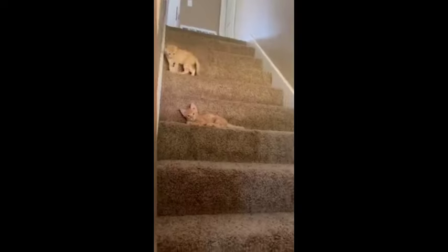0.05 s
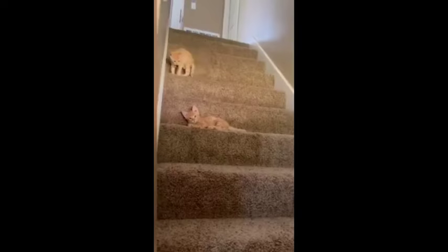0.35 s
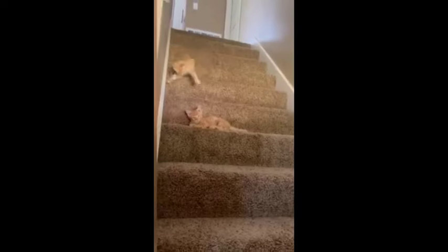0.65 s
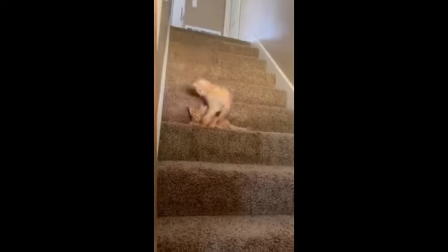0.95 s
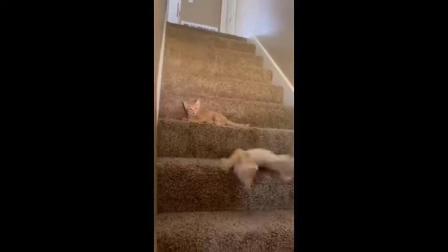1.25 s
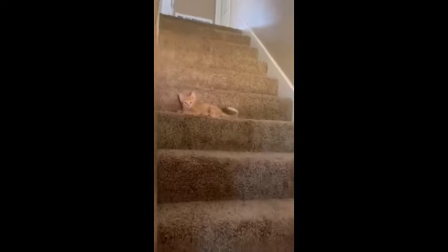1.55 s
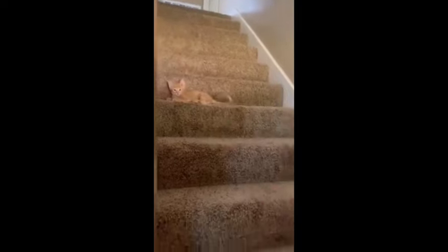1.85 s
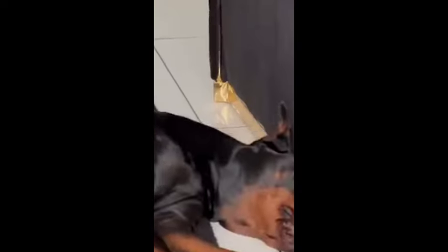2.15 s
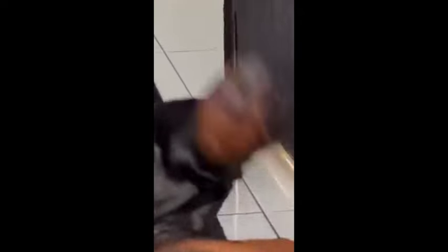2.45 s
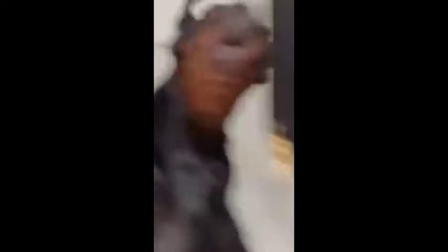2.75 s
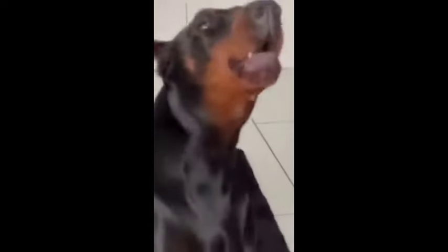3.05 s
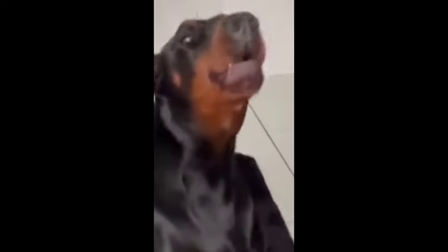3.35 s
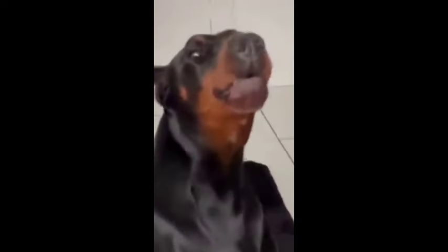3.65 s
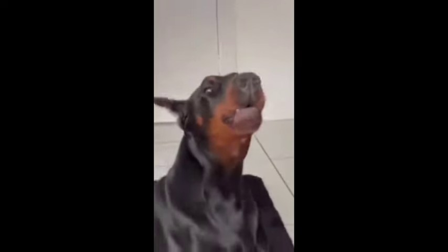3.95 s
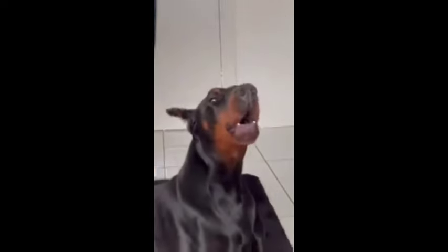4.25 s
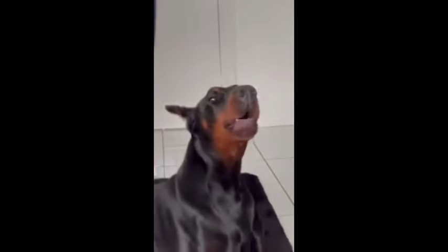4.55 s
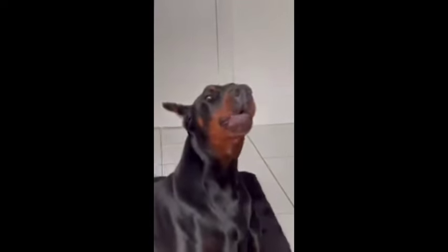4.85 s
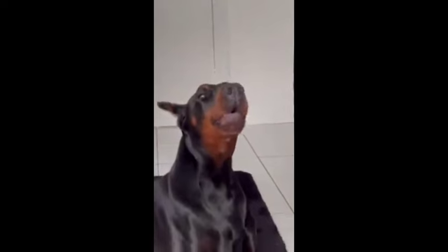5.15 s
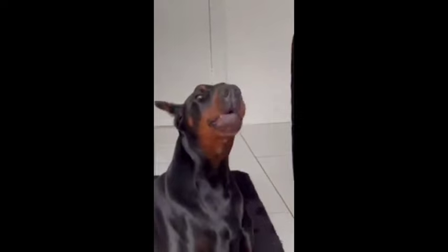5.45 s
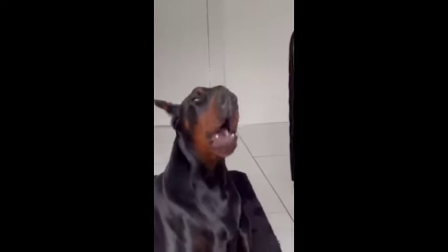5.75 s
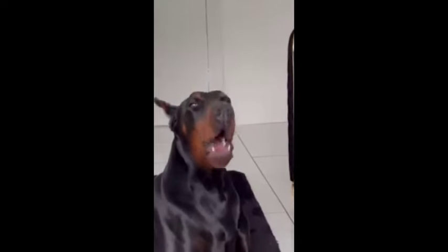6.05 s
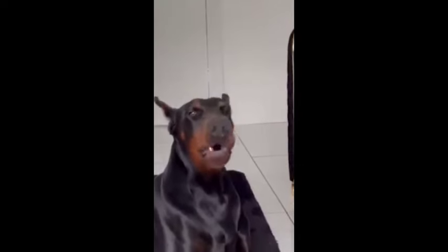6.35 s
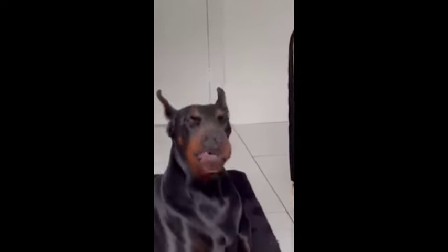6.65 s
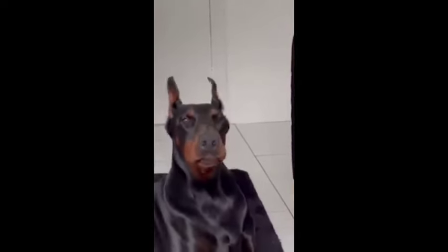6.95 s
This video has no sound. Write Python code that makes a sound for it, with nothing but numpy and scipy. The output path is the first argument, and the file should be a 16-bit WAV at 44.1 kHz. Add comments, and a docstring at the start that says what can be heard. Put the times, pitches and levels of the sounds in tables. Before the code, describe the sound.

Hollow thumps tumble down carpeted wooden stairs, then a large dog gives one long, wavering, cracking howl in a tiled room.

```python
"""A large dog gives one long howl in a tiled room. Its vocal folds chop the breath into pulses, which
throat, nose and muzzle colour. The jaw pumps about three times a second; the voice cracks between a low
and a high register, turns hoarse, then settles on a clean note that sags and dies.
Before the howl, a kitten tumbles down carpeted wooden stairs: hollow treads boom, boards knock and
paws scuff the pile. An abrupt cut joins the two scenes."""
import sys
import numpy as np
from scipy import signal
from scipy.fft import rfft, irfft, next_fast_len
from scipy.io import wavfile
from scipy.ndimage import uniform_filter1d, minimum_filter1d, map_coordinates

SR = 44100
rng = np.random.default_rng(int(sys.argv[2]) if len(sys.argv) > 2 else 0)


def digitize_waveform(pressure):
    """Quantize a signal to 16-bit integers and store it at the path in sys.argv[1].

    Rows of a 2-D input are taken as channels; values are limited to [-1, 1].
    """
    field = np.atleast_2d(pressure).T
    bounded = np.clip(field, -1, 1)
    quanta = np.round(bounded * 32767).astype(np.int16)
    wavfile.write(sys.argv[1], SR, quanta)


N = 316839
TIME = np.arange(N) / SR
CUT_S, HOWL_START_S, HOWL_END_S = 2.052, 2.108, 6.5
STRIKE_SPREAD_DB = 2.5   # how much each ringing note varies from one landing to the next

# Paws and body landing: start_s, boom_db, boom_hz, knock_db, scuff_db, knock_top_hz, clack_db
LANDINGS = [(0.798, -44, 70.3, -27.5, -55, 905, -45), (0.815, -15, 71, -25, -67, 380, -74),
            (0.943, -22.5, 77, -38.5, -76, 600, -73), (1.002, -27.5, 69.5, -29, -70, 498, -48),
            (1.099, -12, 76.3, -30.5, -67, 480, -70.5), (1.139, -14.5, 81.4, -31.5, -49.5, 450, -67.5),
            (1.2, -9, 80.5, -13.5, -50.5, 1590, -31.5), (1.258, -7.5, 72.1, -30.5, -52, 402, -69),
            (1.394, -29, 75, -56, -53.5, 700, -42.5), (1.514, -10, 78.5, -31, -51.5, 550, -67),
            (1.576, -1, 74.6, -13.5, -42, 694, -42), (1.586, -30, 75, -35, -51, 900, -24),
            (1.625, -6.5, 90.3, -49.5, -47, 500, -69.5), (1.635, -27, 86, -24.5, -42.5, 500, -21),
            (1.648, -6.5, 73, -34.5, -37.5, 597, -54), (1.766, -3.5, 91.7, -15, -42.5, 430, -21.5),
            (1.809, -13, 72.3, -28.5, -44, 500, -37), (1.871, -13.5, 103.5, -19.5, -47, 546, -45),
            (1.879, -15, 72.5, -38.5, -43.5, 596, -53), (1.941, -11, 99.3, -34.5, -71.5, 650, -62),
            (2.019, -20, 93.1, -39, -81, 550, -73)]
# Tone colour of a dull knock on wood: frequency_hz, level_db
KNOCK_SPECTRUM = [(60, -33), (150, 14.5), (300, 4), (600, -8.5), (1000, -19), (1500, -32), (3000, -36),
                  (6000, -63)]
# Each pump of the jaw is a surge of the voice: wide_open_s, opening_s, hold_s, pitch_lift_hz,
# roughness (0-1), beat_depth (0-1), then gain_db for each of the howl's five bands, low to high
SURGES = [(2.194, .08, .07, 89.5, 0, 0, 3, 19.5, 13, 13.6, 16.5),
          (2.517, 0.05, .068, 98.5, 0.06, 0.07, 4, 13, 11.4, 7.5, 10.7),
          (2.84, 0.074, .02, 18.5, 0.03, 0, 6, -3.5, 12.4, 4.9, 2.4),
          (3.133, 0.059, 0.018, 19, 0, 0.06, 11, -4.5, 5.1, 8.6, 7),
          (3.445, 0.085, .06, 5.5, 0.25, 1, -3.5, -0.5, 9.8, 7.8, 7.9),
          (3.829, .08, 0.092, -5.5, 0.1, 0.89, 7.5, -1, 6.5, 5, 5.8),
          (4.188, 0.087, .107, -0.5, 0.3, 0.49, 1.5, -9.5, 3.9, 6.6, 16.6),
          (4.579, 0.075, .097, 0.5, 0.3, 0.23, 4.5, -12, 6, 7.2, 6.8),
          (4.997, 0.092, 0.05, 1.5, 0.05, 0.06, 7.5, -10.5, 10.3, 6.1, 6),
          (5.314, 0.092, 0.051, -7, 0.06, 0.02, -6.5, -2.5, 6.4, 7.6, 5.4),
          (5.689, 0.044, .12, 0.5, 0.01, 0, 9.5, -0.5, 7.5, 11.7, 4.1),
          (6.065, 0.036, .085, 33.5, 0.01, 0, 4.5, 7.5, 8.7, 4.1, 7.1),
          (6.403, 0.043, 0.028, 0.5, 0, 0.01, -2, 9, 5.2, 6, 1.7)]
# Tune of the thin high register: time_s, pitch_hz
HIGH_NOTE = [(2.95, 570.8), (3.0, 549.4), (3.04, 544.1), (3.07, 526.9), (3.21, 585.5), (3.25, 535.8),
             (3.3, 536.3), (3.365, 579.2), (3.39, 534.7), (3.45, 524.3), (3.55, 510.1), (3.64, 488.7),
             (3.7, 529.4), (3.77, 503.9), (3.9, 511.1), (4.02, 505), (4.08, 484), (4.15, 505),
             (4.35, 495.6), (4.38, 483.7), (4.41, 476.5), (4.47, 475.7), (4.51, 490.3), (4.54, 499.7),
             (4.58, 500), (4.67, 496.1), (4.73, 507.5), (4.81, 477.4), (4.85, 476), (4.88, 487.1),
             (4.98, 471.8), (5.04, 476.2), (5.19, 487.4), (5.22, 469.8)]
# When the voice cracks into the high register: start_s, length_s
CRACKS = [(2.932, .148), (3.211, 2.02)]


def from_db(db):
    """Turn decibels into a factor to multiply by."""
    return 10 ** (np.asarray(db) / 20)


def rms_one(x):
    """Scale a signal so its average level (rms) is 1."""
    return x / np.sqrt(np.mean(x ** 2) + 1e-20)


def in_time(rows):
    """Join rows that start with a time by straight lines, giving one curve per other column."""
    times, *columns = np.transpose(rows)
    return [np.interp(TIME, times, column) for column in columns]


def ramp(start_s, length_s):
    """Rise steadily from 0 to 1, then stay there."""
    return np.clip((TIME - start_s) / length_s, 0, 1)


def phase_of(hz):
    """Add up a changing frequency into the angle of a wave."""
    return 2 * np.pi * np.cumsum(hz) / SR


def shaped(x, spectrum):
    """Colour a sound with a curve of (frequency_hz, level_db) points."""
    size = next_fast_len(N)
    hz = np.arange(size // 2 + 1) * SR / size + 1
    points_hz, db = np.transpose(spectrum)
    gain = from_db(np.interp(np.log(hz), np.log(points_hz), db))
    return irfft(rfft(x, size) * gain, size)[:N]


def filtered(x, order, edge_hz, keep):
    """Keep the "low" or "high" side of a frequency without delaying the sound."""
    return signal.sosfiltfilt(signal.butter(order, edge_hz, keep, fs=SR, output="sos"), x)


def resonance(x, hz, width_hz):
    """Pick out the narrow band of a sound around one frequency."""
    return signal.lfilter(*signal.iirpeak(hz, hz / width_hz, fs=SR), x)


def noise(spectrum, envelope=1):
    """Coloured noise whose level follows the envelope."""
    white = rng.standard_normal(N)
    return shaped(white * envelope, spectrum) / np.std(shaped(white, spectrum))


def drift(hz):
    """A random wander, about 1 in size, that moves at up to the given rate."""
    smoothing = signal.butter(2, hz, fs=SR, output="sos")
    return rms_one(signal.sosfilt(smoothing, rng.standard_normal(N + SR))[SR:])


def ring(clicks, hz, t60):
    """Each click sets a pure tone ringing; t60 is the seconds it takes to fall by 60 dB."""
    decay, step = from_db(-60 / (t60 * SR)), 2 * np.pi * hz / SR
    return signal.lfilter([0, np.sin(step)], [1, -2 * decay * np.cos(step), decay ** 2], clicks + 1e-18)


def fade(clicks, t60):
    """Each click starts a level curve that dies away."""
    return signal.lfilter([1], [1, -np.exp(-np.log(1000) / (t60 * SR))], clicks + 1e-18)


def reflections(x, t60):
    """Dense echoes off hard walls, about as strong as the sound that feeds them."""
    age = TIME[:SR]
    echoes = rng.standard_normal(SR) * np.exp(-np.log(1000) * age / t60) * (age > .003)
    return signal.fftconvolve(x, echoes / np.sqrt(np.sum(echoes ** 2)))[:N]


def evened(x, window_s):
    """Even out loud and quiet stretches so the level stays near 1."""
    size = int(window_s * SR)
    power = uniform_filter1d(uniform_filter1d(x ** 2, size), size)
    return x / np.sqrt(np.abs(power) + 1e-9 * np.mean(x ** 2))


def stairwell_air(house_db=-57.5, hiss_db=-57):
    """Quiet house noise, with a brighter hiss in the first moment."""
    # Tone colours of the house noise and the hiss: frequency_hz, level_db
    house_spectrum = [(15, -32.5), (25, -20.5), (60, -2.5), (293, -15), (427, -18.5), (621, -23.5),
                      (769, -27.5), (1090, -30), (1630, -32.5), (2240, -21.5), (2560, -33), (7280, -37),
                      (9270, -46), (11500, -58.5), (15000, -58.5)]
    hiss_spectrum = [(300, 15.5), (3000, 1), (5800, 3), (6800, 13), (8000, -6), (12000, -6), (15000, -32)]
    house = from_db(house_db) * noise(house_spectrum)
    return house + from_db(hiss_db) * noise(hiss_spectrum) * (1 - ramp(0.003, 0.13))


def blows(levels_db):
    """One click per landing, at the given levels."""
    clicks = np.zeros(N)
    clicks[[round(row[0] * SR) for row in LANDINGS]] = from_db(levels_db)
    return clicks


def carpet(tail_db=-17, rustle_db=-63, flicker_db=1.5):
    """Paws scuff the pile at each landing, over a faint flickering rustle."""
    # Tone colours of the scuff and the rustle: frequency_hz, level_db
    scuff_spectrum = [(300, -3), (1000, 5.5), (2400, 2), (3200, -5.5), (4500, -10.5), (8000, -17.5),
                      (12000, -34), (15000, -33.5)]
    rustle_spectrum = [(200, -9.5), (1400, 1.5), (2300, 7), (4000, 0), (5200, -11.5), (9000, -11),
                       (12000, -29), (15000, -11.5)]
    scuffs_db = np.transpose(LANDINGS)[4]
    scuff_level = fade(blows(scuffs_db), t60=0.054) + fade(blows(scuffs_db + tail_db), t60=0.13)
    rustle_level = from_db(rustle_db + flicker_db * drift(13)) * ramp(0.39, 0.68)
    return noise(scuff_spectrum, scuff_level) + noise(rustle_spectrum, rustle_level)


def tread_clacks():
    """A hard landing gives a hollow clack on the front edge of a tread."""
    # Notes at which that edge rings: pitch_hz, level_db, t60_s
    edge_notes = [(679, -11, .09), (817, -3, 0.038), (873, 2, 0.018)]
    out, clacks_db = np.zeros(N), np.transpose(LANDINGS)[6]
    for k, (hz, db, t60) in enumerate(edge_notes):
        clicks = blows(clacks_db + db + rng.normal(0, STRIKE_SPREAD_DB, len(clacks_db)))
        out += (-1) ** k * ring(clicks, hz, t60)
    return out


def knock_tails(tail_db=-18):
    """A soft wash of noise lingers after each knock."""
    knocks_db = np.transpose(LANDINGS)[3]
    return noise(KNOCK_SPECTRUM, fade(blows(knocks_db + tail_db), t60=0.81))


def board_knocks(ring_db=-5, thud_db=-1, thud_t60=0.05):
    """Each landing knocks the boards into ringing; the softer the contact, the duller the knock."""
    # Notes at which the staircase rings: pitch_hz, level_db, t60_s
    stair_notes = [(67.36, -3.5, 0.93), (93.6, -3, 1), (122, -2, 0.53), (161.7, -4.5, 0.55),
                   (211.7, -3, 0.39), (227, 4, 0.079), (282, 4, 0.056), (389, 2, 0.064), (476, -9, 0.1),
                   (640, -10.5, 0.12), (726, -6, 0.033), (839, -21.5, 0.07), (1230, -23.5, 0.041),
                   (2050, -23, 0.089)]
    out, grain, age = np.zeros(N), noise(KNOCK_SPECTRUM), TIME[:SR]
    hz, db, t60 = np.transpose(stair_notes)
    signs = (-1) ** np.arange(len(hz))[:, None]
    tones = signs * from_db(-60 * age / t60[:, None]) * np.sin(2 * np.pi * hz[:, None] * age)
    for start_s, _, _, knock_db, _, top_hz, _ in LANDINGS:
        span = slice(round(start_s * SR), round(start_s * SR) + SR)
        boards = from_db(db + ring_db + rng.normal(0, STRIKE_SPREAD_DB, len(hz))) @ tones
        thud = grain[span] * from_db(thud_db - 60 * age / thud_t60)
        dulling = signal.butter(3, top_hz, fs=SR, output="sos")
        out[span] += from_db(knock_db) * signal.sosfilt(dulling, boards + thud)
    return out


def tread_booms(swell_s=0.027, sharpness=3.56, cavity_db=-14):
    """Carpet spreads each landing, so the tread's boom swells and fades; the hollow below rumbles on."""
    booms, age = np.zeros(N), TIME[:SR // 3]
    swell = (age / swell_s * np.exp(1 - age / swell_s)) ** sharpness
    for start_s, boom_db, hz, *_ in LANDINGS:
        at = round(start_s * SR)
        booms[at:at + len(age)] += from_db(boom_db) * swell * np.sin(2 * np.pi * hz * age)
    return booms + from_db(cavity_db) * reflections(booms, t60=0.54)


def tiled_room(voice, t60=0.88, sway_s=.00012):
    """Hard tiles return the treble best; the nearest echoes shift as the dog's head sways."""
    # Strength of the room's echo against the direct sound: frequency_hz, level_db
    echo_spectrum = [(400, -6), (900, -7), (1800, -4.5), (2800, 0), (6000, 3)]
    # Echoes off the nearest tiles: delay_s, gain
    near_echoes = [(.0011, 0.64), (.0023, 0.35), (.0041, .4)]
    room = voice + shaped(reflections(voice, t60), echo_spectrum)
    treble = filtered(room, 2, 1900, "high")
    for delay_s, gain in near_echoes:
        room += gain * np.interp(TIME - delay_s - sway_s * drift(2), TIME, treble)
    return room


def jaw(strengths=1, close_s=0.09):
    """The jaw opens, holds and closes on every surge; each surge can have its own strength."""
    coarse_time = TIME[::40]
    shapes = [np.interp(coarse_time, [s - opening, s, s + hold, s + hold + close_s], [0, 1, 1, 0])
              for s, opening, hold, *_ in SURGES]
    return np.interp(TIME, coarse_time, (np.ones(len(SURGES)) * strengths) @ np.array(shapes))


def yelp():
    """How near the voice is to a full yelp: 1 on the surge with the biggest pitch lift."""
    lifts_hz = np.transpose(SURGES)[3]
    return jaw(lifts_hz / lifts_hz.max())


def open_mouth(voice, ring_db=-6.5):
    """A hoarse surge forces the mouth wide, and its resonance stands out."""
    hoarse = jaw(np.transpose(SURGES)[5])
    return voice + from_db(ring_db) * hoarse * resonance(voice, hz=1290, width_hz=320)


def muzzle(voice, open_rise=0.016, yelp_rise=0.15):
    """The muzzle shortens as the jaw opens and the lips draw back, so its resonances slide up."""
    # Narrow resonances of the long muzzle: frequency_hz, width_hz, level_db
    peaks = [(2630, 37, 2), (4800, 340, -4.5), (4910, 60, 14), (5120, 140, 2.5), (5880, 110, 10),
             (6520, 190, 0.5), (7300, 87, 0)]
    # Stretch the sound, filter it, squeeze it back: the resonances move but the pitch does not.
    clock = np.cumsum(1 + open_rise * (jaw() - 1) + yelp_rise * yelp())
    stretched = map_coordinates(voice, [np.interp(np.arange(int(clock[-1])), clock, np.arange(N))])
    ringing = sum(from_db(db) * resonance(stretched, hz, width_hz) for hz, width_hz, db in peaks)
    return map_coordinates(stretched + ringing, [clock])


def nose(voice, bypass_share=0.5):
    """The nasal passage swallows a few narrow bands; a yelp partly bypasses it through the mouth."""
    # The swallowed bands: frequency_hz, width_hz
    notches = [(3020, 300), (3420, 110), (3800, 400), (4200, 99), (5580, 160), (6330, 230)]
    hollow = voice
    for hz, width_hz in notches:
        hollow = signal.lfilter(*signal.iirnotch(hz, hz / width_hz, fs=SR), hollow)
    return hollow + bypass_share * yelp() * (voice - hollow)


def slack_folds(voice, pitch_hz, tight_hz=440, db_per_hz=.13):
    """Slack folds close softly, so the top overtones weaken as the pitch drops."""
    treble = filtered(voice, 4, 2400, "high")
    treble_db = db_per_hz * np.clip(pitch_hz - tight_hz, -90, 0)
    return voice + (from_db(treble_db) - 1) * treble


def after_cracks(decay_s):
    """A curve that jumps by 1 at each crack of the voice and dies away."""
    return sum((TIME >= s) * np.exp(-np.abs(TIME - s) / decay_s) for s, _ in CRACKS)


def fold_pitch(is_high, overshoot_hz=25.1, wander_hz=7):
    """The pitch flips between two registers; after a crack it overshoots and wanders, then steadies."""
    # Tune of the low register, swooping up at first and sagging at the end: time_s, pitch_hz
    low_note = [(2.115, 184.2), (2.16, 139.7), (2.178, 200.9), (2.2, 267.3), (2.24, 351.4), (2.3, 383.8),
                (2.36, 347.8), (2.42, 356.2), (2.55, 370.5), (2.7, 381.5), (2.95, 391.3), (3.2, 404.4),
                (5.24, 445.3), (5.47, 454.5), (5.64, 428.3), (5.9, 427.4), (5.99, 420.3), (6.06, 401.8),
                (6.2, 395.2), (6.33, 384), (6.45, 350), (6.52, 313)]
    # A shiver in the high note, slowing as the dog tires: time_s, rate_hz, depth (share of the pitch)
    trill = [(4.34, 42, 0), (4.41, 42, .028), (4.72, 40, .028), (4.83, 34, .01), (4.93, 26, .022),
             (5.2, 17, .014)]
    low = in_time(low_note)[0] + jaw(np.transpose(SURGES)[3], close_s=0.1)
    high = in_time(HIGH_NOTE)[0] + overshoot_hz * after_cracks(0.033)
    high += wander_hz * after_cracks(.5) * drift(18)
    trill_hz, trill_depth = in_time(trill)
    high *= 1 + trill_depth * np.sin(phase_of(trill_hz * (1 + .1 * drift(8))))
    return low + is_high * (high - low)


def beat_rate(pitch_hz, is_high, late_s=4.11, slowing=0.66):
    """The two folds beat against each other in a pattern that repeats every 2, 4 or 6 cycles."""
    cycles = np.where(is_high < .5, 2, np.where(TIME < late_s, 4, 6))
    # Early in the high register, the beat starts slow each time the jaw opens.
    swoop = sum(np.interp(TIME, [s - opening - .02, s - opening, s - opening + .08], [0, 1, 0])
                for s, opening, *_ in SURGES)
    return pitch_hz / cycles * (1 - slowing * swoop * is_high * (TIME < late_s))


def hoarseness(is_high):
    """The folds rasp when pushed; returns their random roughness and the depth of their beat."""
    surge_roughness, surge_beats = np.transpose(SURGES)[4:6]
    croak = 1 - ramp(HOWL_START_S, 0.1)
    cracked = after_cracks(.11) * is_high
    doubling = ramp(2.57, 0.043) - ramp(2.777, 0.043)   # uneven closing adds the octave below
    resting = .035 - .017 * ramp(5.35, 0.37)   # the closing note is the cleanest
    fraying = ramp(6.35, 0.44)   # the air runs out
    rough = resting + jaw(surge_roughness) + 1.6 * croak + .25 * cracked + 0.18 * doubling + 0.3 * fraying
    beat_depth = jaw(surge_beats, close_s=0.18) + .5 * croak + .65 * cracked + 0.54 * doubling
    return rough, beat_depth


def breakaway_fold(pulses, gain=0.95, duck=.45, second_db=4, third_db=-11, jitter=.018):
    """One fold breaks away in a tone that arches above the high note, while the main pulses dip."""
    # The arches: start_s, length_s, rise_hz, strength (0-1)
    arches = [(2.468, 0.051, 14.3, .4), (2.569, .1, 11, 0.5), (3.04, .06, 10, .6), (3.391, .25, 120, 0.6),
              (3.776, .235, 122, 0.7), (4.118, .09, 43.6, 0.4), (4.245, .12, 140, 0.3)]
    hz, presence = in_time(HIGH_NOTE)[0], np.zeros(N)
    for start_s, length_s, rise_hz, strength in arches:
        arch = np.sin(np.pi * ramp(start_s, length_s))
        hz += rise_hz * arch
        presence += strength * np.minimum(3 * arch, 1)
    phase = phase_of(hz * (1 + jitter * drift(70)))
    tone = np.sin(phase) + from_db(second_db) * np.sin(2 * phase) + from_db(third_db) * np.sin(3 * phase)
    return pulses * (1 - duck * presence) + gain * presence * tone


def wavering(pitch_hz, rough, waver=0.0065, jitter=0.028, wobble=.016, tired_waver=.009):
    """The pitch is never quite steady, and less so when the voice is rough or tired."""
    unsteady = waver * drift(9) + (rough + .03) * (jitter * drift(110) + wobble * drift(25))
    return pitch_hz * (1 + unsteady) * (1 + tired_waver * ramp(5.3, 1.1) * drift(14))


def fold_pulses(pitch_hz, beat_hz, rough, beat_depth, shimmer=.5, dull_db=4.5, drone=.25, slow_share=.32):
    """The vocal folds chop the breath into pulses; returns the pulses and the angle of their cycle."""
    phase = phase_of(wavering(pitch_hz, rough))
    # Roughness lets the beat slip about, so the rasp never turns into a steady buzz.
    beat = phase_of(beat_hz * (1 + .3 * rough * drift(60) + .04 * drift(12)))
    swing = beat_depth * np.sin(beat)   # moves each pulse in time and changes its strength
    closure = phase + swing
    strength = 1 + .65 * swing + shimmer * rough * drift(170)
    # The long throat delays the upper harmonics, spreading each pulse over its cycle.
    cycle = np.mod(closure, 2 * np.pi).astype(np.float32)
    harmonics = [np.cos(k * cycle - .55 * k * k) for k in range(1, 36)]
    brightness = from_db(dull_db * (jaw() - 1.5))   # overtones weaken as the jaw shuts
    pulses = strength * (sum(harmonics[:2]) + brightness * sum(harmonics[2:]))
    # Folds that swing evenly strengthen the lowest harmonic.
    pulses += np.clip(1 - 2 * beat_depth, 0, 1) * np.cos(closure - .55)
    slow_fold = slow_share * beat_depth * np.cos(phase - beat)   # its own note, under the main one
    return breakaway_fold(pulses) + drone * swing - slow_fold, closure


def dog_voice(air_db=-36, clean_air=0.035):
    """Pulses coloured by the throat mix with rushing breath and pass nose, muzzle and mouth."""
    # Tone colours of the throat and of air rushing between the folds: frequency_hz, level_db
    throat_spectrum = [(20, -56), (70, -22.5), (130, -7.5), (250, -11), (400, 2.5), (560, 0.5), (750, 6.5),
                       (1000, 5.5), (1270, -8), (1480, -10), (1750, -10.5), (2250, -33.5), (2600, -33),
                       (2850, -38.5), (3100, -41), (4000, -38), (4800, -40), (7400, -42), (8400, -55),
                       (10500, -49), (12000, -71), (15000, -58)]
    air_spectrum = [(20, -61), (100, -28), (260, -18), (450, -2), (1000, 1.5), (1800, 5), (2700, -15),
                    (3300, -22.5), (4000, -25), (4800, -4.5), (6000, -9.5), (7500, -12), (8300, -25),
                    (10500, -18), (12000, -39.5), (15000, -31)]
    is_high = sum(ramp(s - .008, .025) - ramp(s + length_s, .025) for s, length_s in CRACKS)
    pitch_hz = fold_pitch(is_high)
    rough, beat_depth = hoarseness(is_high)
    pulses, closure = fold_pulses(pitch_hz, beat_rate(pitch_hz, is_high), rough, beat_depth)
    tone = rms_one(shaped(pulses, throat_spectrum))
    gap = 1 + np.cos(closure)   # air escapes in the open part of each cycle
    air = from_db(air_db) * noise(air_spectrum, (rough + clean_air) * gap)
    voice = muzzle(nose(slack_folds(tone + air, pitch_hz)))
    return open_mouth(voice * ramp(HOWL_START_S, 0.01) * (1 - ramp(HOWL_END_S - .04, 0.19)))


def pumping_bands(sound, window_s=0.072):
    """Five bands of the howl each follow their own level, surging with the jaw and dying at the end."""
    # Borders between the bands: frequency_hz
    edges_hz = [700, 1150, 2000, 3200]
    # The voice between surges: time_s, then level_db for each band, low to high
    sustain = [(2.14, -24, -40, -46, -44.5, -63.5), (2.221, -20, -44.5, -38, -50, -61.5),
               (2.34, -23.5, -26.0, -48.5, -44.5, -52), (2.378, -19, -42.5, -44, -46, -57),
               (2.46, -24, -43, -42.5, -55, -56), (2.502, -36, -28, -44, -58, -55),
               (2.541, -21, -38.5, -45, -52.5, -59), (2.7, -30, -34, -42, -51.5, -61),
               (2.74, -29.5, -39.5, -42.5, -63, -66.5), (2.8, -31, -35.5, -47.5, -54.5, -63.5),
               (3.24, -27.5, -32.5, -39.5, -57, -66.0), (3.34, -24.0, -42.5, -46.5, -56.5, -67.5),
               (3.381, -23, -31.5, -44.5, -58, -64), (3.619, -27, -39.0, -40, -57, -66),
               (3.68, -35.0, -40.5, -49.0, -63, -72), (3.719, -30, -44.5, -50, -57.5, -73),
               (3.778, -34, -30.0, -47.5, -59, -66.5), (3.86, -34, -44, -43, -58.5, -67),
               (4.08, -34.0, -32.5, -52.0, -62.5, -72), (4.301, -29.5, -36.5, -48.5, -60.5, -79.5),
               (4.42, -32, -31.5, -55, -68, -71.5), (4.48, -25.5, -30, -53.5, -67, -74.5),
               (4.52, -31, -30.5, -52, -63.5, -69.5), (4.76, -38.0, -34, -52.5, -65.5, -73),
               (4.821, -26.5, -31.5, -55, -66, -72), (5.259, -27.5, -38.5, -54.5, -70, -72.5),
               (5.5, -32.5, -41, -52.5, -67.5, -75), (5.56, -43, -44, -59.5, -64, -81),
               (5.6, -36.5, -43.5, -54, -65, -76.5), (5.94, -27.5, -40, -43.5, -65.5, -80.5),
               (6.18, -29, -47.0, -57.5, -68, -80), (6.24, -32.0, -42.5, -56.5, -70.5, -82),
               (6.38, -33, -67, -59, -70.5, -84), (6.52, -50.5, -65.5, -67, -76, -83.5)]
    # How long the last echo rings in each band: t60_s
    last_echo_t60 = [0.6, 0.5, 0.48, 0.5, 0.63]
    bands, rest = [], sound
    for edge_hz in edges_hz:
        bands.append(filtered(rest, 8, edge_hz, "low"))
        rest = rest - bands[-1]
    bands.append(rest)
    out, surges_db = np.zeros(N), np.transpose(SURGES)[6:]
    dying_s = np.maximum(TIME - sustain[-1][0], 0)
    for band, sustain_db, gains_db, t60 in zip(bands, in_time(sustain), surges_db, last_echo_t60):
        out += from_db(sustain_db + jaw(gains_db) - 60 * dying_s / t60) * evened(band, window_s)
    return out


def swelling(sound, max_width_hz=380):
    """Single tones within the howl swell or fade for a moment."""
    # The swells and dips: middle_s, half_length_s, frequency_hz, gain_db
    swells = [(2.142, 0.027, 380, 11.5), (2.147, 0.079, 950, 7.5), (2.165, 0.044, 1390, 8.5),
              (2.202, 0.05, 357, 8), (2.236, .06, 1660, 4.5), (2.247, 0.055, 2180, 3),
              (2.31, 0.32, 2680, -17), (2.266, 0.041, 5740, 4), (2.569, 0.073, 2220, 14),
              (2.56, 0.13, 2620, -18), (2.57, 0.13, 1500, -13), (2.638, .06, 480, 8),
              (2.864, .1, 3220, -13), (3.258, 0.039, 409, 5), (3.476, 0.068, 480, 13),
              (3.88, 0.055, 388, 3.5), (3.89, 0.1, 1297, 3), (4.212, 0.066, 1430, 6.5),
              (4.46, .08, 1830, 11), (4.34, 0.056, 493, -11), (4.617, .12, 4950, 6),
              (4.999, .12, 4850, 8.5), (4.996, 0.028, 1410, 5), (5.01, 0.056, 1900, -5),
              (5.36, 0.13, 1340, 7), (5.347, 0.088, 2230, 9.5), (5.435, 0.028, 450, -21.5),
              (5.646, 0.052, 2500, 20), (5.738, .06, 1710, 0.5), (5.845, 0.18, 1704, -13),
              (5.894, 0.046, 425, -10.5), (6.035, 0.061, 1620, 5.5), (6.1, 0.098, 1280, -4),
              (6.358, .07, 1140, -5.5)]
    out = sound.copy()
    for middle_s, half_s, hz, db in swells:
        near = np.abs(TIME - middle_s) < half_s
        tone = signal.filtfilt(*signal.iirpeak(hz, max(hz / max_width_hz, 4), fs=SR), sound[near])
        bump = np.cos(np.pi / 2 * (TIME[near] - middle_s) / half_s) ** 2
        out[near] += (from_db(db) - 1) * bump * tone
    return out


def howl(drive_share=0.66):
    """The dog's voice rings in the tiled room, each surge echoing into the gap after it."""
    middle_band_db = np.transpose(SURGES)[8]
    voice = dog_voice() * from_db(drive_share * jaw(middle_band_db))
    sound = swelling(pumping_bands(tiled_room(voice)))
    return sound * ramp(HOWL_START_S, .055) * (1 - ramp(6.62, 0.33))


def scene():
    """The kitten on the stairs with a little stereo width, an abrupt cut, then the dog dead centre."""
    # Stereo width of the stairwell, as side against centre: frequency_hz, level_db
    width = [(60, -43.5), (150, -26), (380, -2.5), (950, -4.5), (2380, -10.5), (5980, -3.5), (15000, 7)]
    tumble = tread_clacks() + knock_tails() + carpet() + tread_booms() + board_knocks()
    stairwell, before_cut = tumble + stairwell_air(), TIME < CUT_S
    centre = stairwell * before_cut + howl()
    side = shaped(reflections(stairwell, t60=0.0057), width) * before_cut
    return np.array([centre + side, centre - side])


def record(dry):
    """A smooth limiter turns down the highest peaks, and the very top of the treble is cut steeply."""
    ceiling, cutoff_hz, window = .95, 15800, SR // 100
    needed_gain = np.minimum(1, ceiling / (np.abs(dry).max(axis=0) + 1e-9))
    gain = uniform_filter1d(minimum_filter1d(needed_gain, 2 * window), window)
    return signal.sosfilt(signal.ellip(10, .1, 90, cutoff_hz, fs=SR, output="sos"), dry * gain)


dry = scene()
out = record(dry)
digitize_waveform(out)
```